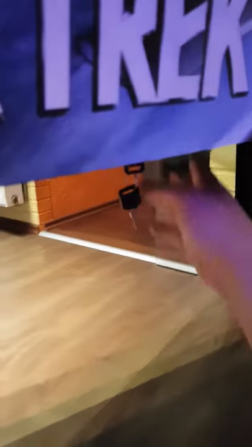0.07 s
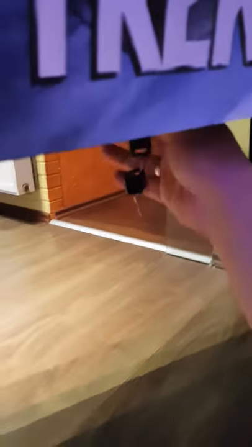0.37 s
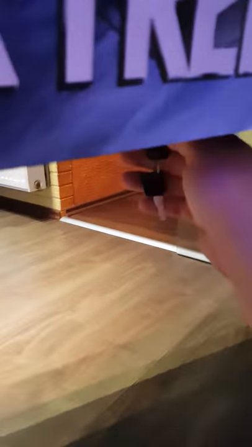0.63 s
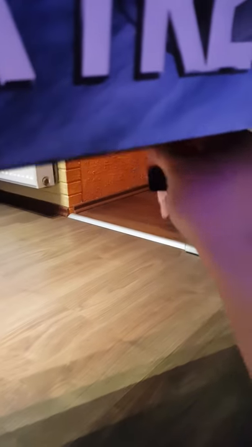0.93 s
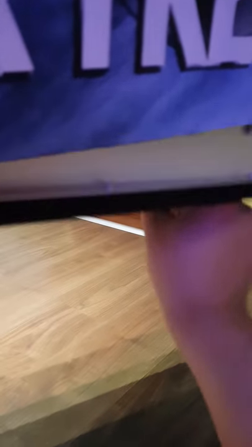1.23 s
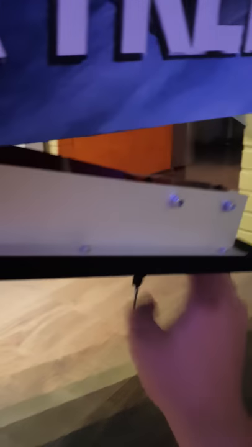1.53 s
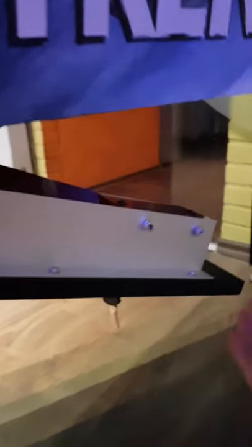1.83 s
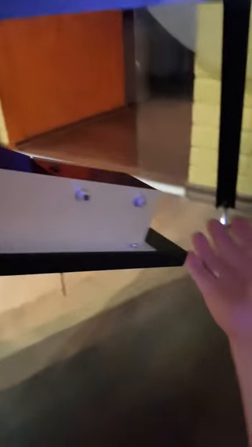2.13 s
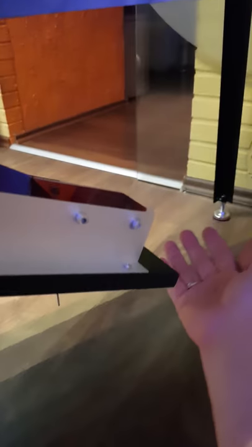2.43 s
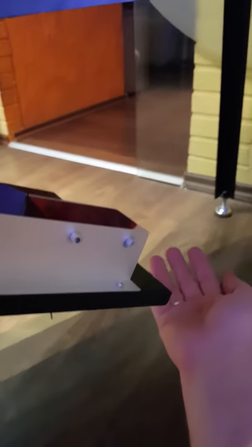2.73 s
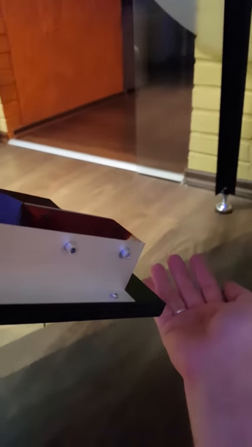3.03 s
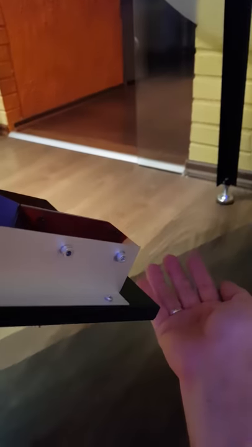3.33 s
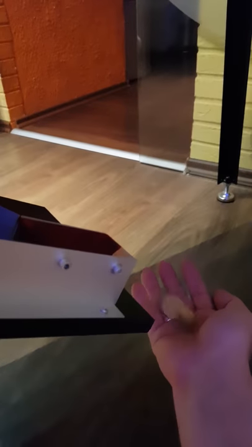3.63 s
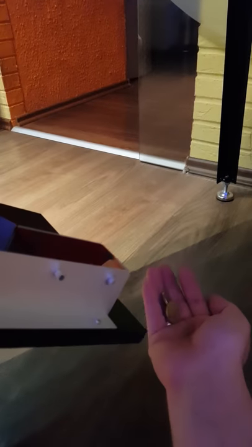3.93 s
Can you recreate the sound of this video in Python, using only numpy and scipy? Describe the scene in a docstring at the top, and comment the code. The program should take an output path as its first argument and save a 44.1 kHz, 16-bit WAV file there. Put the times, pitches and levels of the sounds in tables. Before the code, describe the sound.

Metal coin door unlocking and clacking open, followed by a coin rattling down a return chute.

```python
"""Pinball coin door and coin return

A hand turns the key of a steel coin door; the lock snaps, the wooden cabinet thumps and the door
swings to its stop. A coin clacks through the mechanism, rolls down the return chute and drops,
ringing, into the open hand. All is close to the microphone, in a quiet, hard-walled room."""
import sys
import numpy as np
from scipy import signal
from scipy.fft import rfft, irfft, next_fast_len
from scipy.io import wavfile
from scipy.ndimage import map_coordinates

SR = 44100
rng = np.random.default_rng(int(sys.argv[2]) if len(sys.argv) > 2 else 0)


def int16_out(signal):
    """Quantize to a 16-bit WAV file."""
    q = np.round(np.clip(np.atleast_2d(signal).T, -1, 1) * 32767)
    wavfile.write(sys.argv[1], SR, q.astype(np.int16))


N = 176400
T = np.arange(SR // 2) / SR  # time within one event, s


def struck_steel(hits, modes, colour, ring_db, ring_t60_s, attack_s, pan_db=0, buzz_rad=.7):
    """Each blow is a crash of dense, short-lived plate modes and a few that ring on."""
    out = np.zeros((2, N))
    for start_s, db, tilt_db, t60_s in hits:
        ring = 0
        for hz, mode_db in modes:
            gain = amp(mode_db + 2 * rng.standard_normal())
            phase = 2 * np.pi * hz * T + rng.normal(0, 1, (2, 1))
            buzz = buzz_rad * wobble(len(T), rate_hz=160)  # loose parts smear the modes
            ring += gain * np.sin(phase + buzz)
        blow = noise(len(T)) * fade(t60_s) + amp(ring_db) * ring * fade(ring_t60_s)
        clack = coloured(blow * rise(attack_s), colour, tilt_db, corner_hz=1458)
        add(out, start_s, amp(db) * unit_onset(clack))
    return out * amp([[pan_db], [-pan_db]])


# Each row: start in seconds, level in dB, tilt in dB per octave, t60 in seconds.
LOCK_CLICKS = [(.322, -41.5, -6, 0.053), (.34, -49.5, -0.5, 0.045), (.8755, -39.5, 6, 0.052),
               (.898, -47.5, 9.5, 0.15), (.931, -20.5, 5, 0.09), (.9415, -19, -4, 0.042),
               (1.089, -40, 2, 0.05), (1.149, -36, -2.5, 0.031), (1.159, -38.5, 9, 0.053),
               (1.3455, -27, -3, 0.043), (1.468, -45.5, 2.5, 0.14)]
# Ringing modes and overall spectrum. Each row: frequency in Hz, gain in dB.
LOCK_MODES_DB = [(1420, -3), (1770, 2), (1930, -1), (2030, -4), (2345, -3), (2592, -1), (2685, 0),
                 (3325, 0), (3800, -3), (5392, -1)]
LOCK_SPECTRUM = [(240, -29.5), (400, -9.5), (683, -16.5), (1020, -11), (1420, -0.5), (1590, -6.5),
                 (1930, -3), (3060, -2.5), (3300, -1.5), (5480, -9), (6890, -18), (13300, -25.5),
                 (15500, -43)]

def lock_snaps():
    """The lock and its cam click as the key turns."""
    return struck_steel(LOCK_CLICKS, LOCK_MODES_DB, LOCK_SPECTRUM,
                        ring_db=-21.5, ring_t60_s=.095, attack_s=.0013)


# Each row: start in seconds, level in dB, tilt in dB per octave, t60 in seconds.
DOOR_HITS = [(1.7703, -19, -1, .04), (1.787, -23.5, 2, .04), (1.829, -31, 0, .04), (2.17, -67, 2, .1)]
# Ringing modes and overall spectrum. Each row: frequency in Hz, gain in dB.
DOOR_MODES_DB = [(750, 0), (1816, 3), (2274, 3), (2454, 0), (3507, -2), (3980, -1), (4114, 1), (4616, -1)]
DOOR_SPECTRUM = [(120, -38), (280, -27), (420, -15), (560, -19), (750, -13), (1050, -21), (1500, -11),
                 (1850, -4), (2300, 0), (3200, -2), (4000, 2), (5200, -4), (8000, -7), (11000, -13),
                 (13000, -23), (15500, -36)]

def door_stop():
    """The steel door meets its stop and rebounds."""
    return struck_steel(DOOR_HITS, DOOR_MODES_DB, DOOR_SPECTRUM,
                        ring_db=-24.5, ring_t60_s=.12, attack_s=.001, pan_db=1)


# Each row: start in seconds, level in dB, tilt in dB per octave, t60 in seconds.
MECHANISM_HITS = [(2.915, -65, -4, 0.13), (3.0378, -19, 2.5, 0.083), (3.0757, -26, -2, 0.039),
                  (3.0805, -28.5, -10.5, 0.023), (3.096, -35, -3, 0.13), (3.176, -37.5, -13, 0.11),
                  (3.2045, -34, -7, 0.12), (3.2158, -29, -4, 0.024), (3.2392, -30, -6.5, 0.059),
                  (3.2685, -12, 1, 0.037), (3.272, -15, -1.5, 0.031), (3.278, -15.5, -3.5, 0.038)]
# Ringing modes and overall spectrum. Each row: frequency in Hz, gain in dB.
MECHANISM_MODES_DB = [(700, 5), (1814, -3), (2320, 3), (3836, -3), (3989, 0), (4142, -1), (4345, 0),
                      (4560, 1), (4760, 3), (5017, 3), (6330, 4), (6678, 2), (7850, 1)]
MECHANISM_SPECTRUM = [(120, -38), (300, -37), (520, -32), (700, -20.5), (1000, -30.5), (1430, -15.5),
                      (1620, -17.5), (2300, -4), (3100, -3.5), (4200, 2.5), (5600, -5), (7700, -5),
                      (9000, -7.5), (12000, -13), (15500, -19)]

def mechanism_clacks():
    """The coin strikes the plates of the mechanism."""
    return struck_steel(MECHANISM_HITS, MECHANISM_MODES_DB, MECHANISM_SPECTRUM,
                        ring_db=-28, ring_t60_s=.13, attack_s=.00018, pan_db=1.2, buzz_rad=.4)


# Each row: frequency in Hz, level in dB, t60 in seconds, outer (+1) or inner (-1) mode.
COIN_MODES = [(12657, -1, .3, 1), (13215, -4, .15, -1), (13290, -7, .12, -1), (13380, -4, .15, -1),
              (13576, -6, .3, 1), (13608, -14, .25, 1)]

def coin_ring(lean_db=0):
    """The contact point favours the outer or inner modes; each flutters as the coin tumbles."""
    flutter_hz, flutter_db, flutter_rad = 60, 2, .45
    ring = 0
    for hz, db, t60_s, side in COIN_MODES:
        gain = amp(db + side * lean_db + flutter_db * wobble(len(T), flutter_hz))
        phase = 2 * np.pi * (hz * T + rng.random((2, 1)))
        ring += gain * np.sin(phase + flutter_rad * wobble(len(T), flutter_hz)) * fade(t60_s)
    return ring


# Each row: start in seconds, ring gain in dB, lean to the outer modes in dB, relative click in dB.
COIN_LANDINGS = [(3.6243, -14, -1, -31), (3.639, -16.5, 2, -42), (3.693, -22, -5, -38),
                 (3.713, -17, 4, -34.5), (3.7523, -23.5, -5, -35), (3.781, -28, -2, -55),
                 (3.866, -45, 0, -53), (3.9009, -38, 3, -47), (3.9144, -31, 3, -44.5),
                 (3.9232, -43, -3, -44.5)]
# Each row: frequency in Hz, gain in dB.
CLICK_SPECTRUM = [(500, -46), (2500, -14), (4500, 0), (6500, -3), (8000, 0.5), (10500, -5), (13000, 3),
                  (15000, -3.5)]

def coin_drop():
    """The coin leaves the chute ringing faintly, lands in the hand and bounces on a finger ring."""
    flight_s, flight_db, choke_t60_s = 3.49, -31, .047
    out = np.zeros((2, N))
    add(out, flight_s, amp(flight_db) * coin_ring() * rise(.039) ** 2)
    ends_s = [row[0] for row in COIN_LANDINGS[1:]] + [N / SR]
    for (start_s, ring_db, lean_db, click_db), end_s in zip(COIN_LANDINGS, ends_s):
        free_s = min(end_s - start_s - .008, .045)  # a new contact chokes the ring sooner
        choke = amp(-60 * np.clip(T - free_s, 0, None) / choke_t60_s)
        add(out, start_s, amp(ring_db) * coin_ring(lean_db) * choke * rise(.00023))
        burst = noise(len(T)) * (fade(.0059) + amp(-6) * fade(.15))
        add(out, start_s, amp(click_db + 2.5) * unit_onset(coloured(burst, CLICK_SPECTRUM)))
    return out


# Each row: centre in Hz, bandwidth in Hz, gain in dB.
CHUTE_MODES = [(420, 80, -8), (720, 150, -14), (1425, 100, 3.5), (1860, 100, -9), (2310, 120, 3.5),
               (2570, 150, 0), (4350, 300, -8)]
# Each row: frequency in Hz, gain in dB.
CHUTE_SPECTRUM = [(120, -35), (200, -18.5), (333, -33.5), (422, -12.5), (992, -11), (1400, -7.5),
                  (2060, -6), (2330, -8.5), (3120, -9.5), (4410, -9.5), (9140, -29.5), (13200, -37),
                  (15500, -51.5)]

def chute(x):
    """The return chute's broad colour with its sheet-metal resonances on top."""
    def response(hz):
        modes = sum(amp(db) * resonance(hz, centre, width) for centre, width, db in CHUTE_MODES)
        return amp(-12.5) + modes
    return coloured(filtered(x, response), CHUTE_SPECTRUM)


# Each row: time in seconds, level in dB, the chute's share of the power from 0 to 1.
ROLL_PATH = [(3.03, -120, 0.2), (3.045, -48, 0.3), (3.09, -36.5, 0), (3.17, -46.5, 0.88),
             (3.25, -39.5, 0.97), (3.34, -41, 1), (3.385, -37.5, 0.99), (3.48, -33, 0.87),
             (3.55, -36, 0.97), (3.567, -49.5, 0.84), (3.66, -110, 0.8)]
# Each row: start in seconds, level in dB.
WALL_KNOCKS = [(3.412, -40), (3.4577, -33), (3.479, -37), (3.4887, -33)]

def coin_roll():
    """The milled rim chatters through the mechanism, then down the chute, knocking on its walls."""
    level_db, share = curves(ROLL_PATH)
    in_chute = unit(chute(grit(rate_hz=250, depth_db=1.5)))
    in_mechanism = unit(coloured(grit(rate_hz=1100, depth_db=2), MECHANISM_SPECTRUM))
    out = amp(level_db) * (np.sqrt(share) * in_chute + np.sqrt(1 - share) * in_mechanism)
    for start_s, db in WALL_KNOCKS:
        add(out, start_s, amp(db) * unit_onset(chute(noise(len(T)) * fade(.024))))
    return out


# Each row: start in seconds, relative level in dB, pitch of the push in Hz.
CABINET_BUMPS = [(.222, -51.5, 100), (.286, -35.5, 90), (.322, -34.5, 85), (0.816, -44.5, 175),
                 (0.874, -34.5, 88), (0.929, -32, 112.5), (0.961, -37, 140), (1.14, -31.5, 200),
                 (1.164, -30.5, 215), (1.199, -41, 130), (1.331, -38, 125), (1.457, -43.5, 390),
                 (1.478, -43.5, 130)]
# Each row: frequency in Hz, level in dB, t60 in seconds.
CABINET_MODES = [(80, 0, .06), (112, 2, .06), (168, 1, .08), (208, 0, .085), (430, 1, .06), (780, 5, .05)]
# Each row: frequency in Hz, gain in dB.
WOOD_SPECTRUM = [(35, -30.5), (85, 5), (200, 0), (420, -8.5), (600, -14), (850, -11), (2500, -58.5),
                 (8000, -91.5)]

def cabinet_thumps():
    """Hand and door bump the wooden box; each push favours the modes near its pitch."""
    focus_db_per_octave = 16
    out = np.zeros((2, N))
    for start_s, db, push_hz in CABINET_BUMPS:
        boom = np.zeros((1, len(T)))
        for hz, mode_db, t60_s in CABINET_MODES:
            gain = amp(mode_db - focus_db_per_octave * abs(np.log2(hz / push_hz)))
            boom += gain * np.sin(2 * np.pi * hz * T) * fade(t60_s)
        knock = coloured(noise(len(T)) * fade(.074), WOOD_SPECTRUM)
        thump = unit_onset(boom, samples=800) + amp(-10) * unit_onset(knock, samples=800)
        add(out, start_s, amp(db + 6) * thump * rise(.0065))
    return out


# Each row: start in seconds, pitch in Hz, level in dB.
SQUEAK_SLIPS = [(0.396, 1770, -49), (0.483, 2670, -49.5), (1.215, 2620, -42), (1.244, 2190, -42.5),
                (1.54, 3450, -46.5), (1.68, 3200, -55), (1.754, 2150, -52)]

def squeaks():
    """Each brief slip of key or hinge sings in one narrow resonance over a broad rasp."""
    length_s, width_ratio, rasp_db, rasp_cutoff_hz = .015, .0751, -24.5, 6000
    out = np.zeros((2, N))
    swell = (3 * T / length_s) ** 2 * np.exp(-6 * T / length_s)
    for start_s, pitch_hz, db in SQUEAK_SLIPS:
        def response(hz):
            rasp = amp(rasp_db) / (1 + 1j * hz / rasp_cutoff_hz)
            return resonance(hz, pitch_hz, pitch_hz * width_ratio) + rasp
        tone = filtered(noise(len(T)) * swell, response)
        add(out, start_s, amp(db) * unit_onset(tone, samples=600))
    return out


# Each row: time in seconds, level in dB.
SCRAPE_LEVELS = [(0, -61.5), (.1, -95), (.23, -65), (.3, -59), (.34, -49), (.41, -52), (.45, -41),
                 (.495, -47.5), (.53, -61.5), (.62, -68), (.86, -64.5), (1.05, -54), (1.4, -69),
                 (1.5, -50.5), (1.62, -65.5), (2.3, -78)]
HISS_LEVELS = [(0, -64.5), (.17, -73), (.3, -76.5), (.55, -71), (.72, -63.5), (.85, -66.5), (1, -87.5)]
# Each row: frequency in Hz, gain in dB.
SCRAPE_SPECTRUM = [(240, -9.5), (400, -19), (614, -19.5), (796, -12.5), (1320, -13), (1710, -1), (2030, -6),
                   (4290, -6), (12100, -10), (15500, -7)]
HISS_SPECTRUM = [(3000, -25), (5100, -15.5), (5750, -3.5), (6400, -19.5), (9000, -35.5)]

def key_scrape():
    """The key slides smoothly over the pins; a thin hiss goes with the sliding hand."""
    scrape = unit(coloured(grit(rate_hz=150, depth_db=1.2), SCRAPE_SPECTRUM))
    hiss = unit(coloured(noise(N), HISS_SPECTRUM))
    return amp(curves(SCRAPE_LEVELS)[0]) * scrape + amp(curves(HISS_LEVELS)[0]) * hiss


# Each row: time in seconds, level in dB.
RUSTLE_LEVELS = [(0, -55), (.14, -70), (.45, -55), (.7, -71), (.85, -50.5), (1.5, -58.5), (1.7, -74.5),
                 (2.45, -67)]
# Each row: frequency in Hz, gain in dB.
RUSTLE_SPECTRUM = [(70, 3), (150, -1), (420, -5), (750, -14), (1200, -15.5), (1600, -31), (6000, -44)]

def hand_rustle():
    """Skin and sleeve brush against the cabinet."""
    brush = unit(coloured(grit(rate_hz=36, depth_db=2.5), RUSTLE_SPECTRUM))
    return amp(curves(RUSTLE_LEVELS)[0]) * brush


# Each row: frequency in Hz, t60 in seconds.
ROOM_DECAY = [(80, 1), (400, 0.46), (1500, 0.34), (4000, 0.53), (8000, 0.54), (15000, 0.28)]
# Each row: frequency in Hz, gain in dB.
ROOM_SPECTRUM = [(100, 2), (1500, -4.5), (4000, -8.5), (15000, -9)]
# Each row: frequency in Hz, left-right correlation.
ROOM_COHERENCE = [(100, 0.92), (300, 0.35), (900, 0.62), (3000, 0.03)]

def room_reverb(x, build_s=.0047):
    """The hard walls return a diffuse tail in which each frequency dies at its own speed."""
    hz, t, bands = signal.stft(noise(SR, ROOM_COHERENCE), SR, nperseg=256)
    decay = fade(along(ROOM_DECAY, hz)[:, None], t)
    tail = signal.istft(bands * decay, SR, nperseg=256)[1]
    tail *= rise(build_s, np.arange(tail.shape[1]) / SR)
    tail = coloured(tail / np.linalg.norm(tail[0]), ROOM_SPECTRUM)
    return signal.fftconvolve(x, tail, axes=1)[:, :N]


# Each row: frequency in Hz, gain in dB.
AIR_SPECTRUM = [(15, -45), (25, -19), (59, -1), (193, -16), (233, -20.5), (567, -36), (648, -35),
                (6550, -40), (15500, -33)]

def room_air(level_db=-65.5):
    """A low, steady hum of air."""
    return amp(level_db) * unit(coloured(noise(N, ROOM_COHERENCE), AIR_SPECTRUM))


# Each row: frequency in Hz, left-right correlation.
CLOSE_COHERENCE = [(100, 1), (300, 0.93), (1000, 0.12), (4000, 0.2), (14000, 0.71)]

def noise(size, coherence=CLOSE_COHERENCE):
    """White stereo noise, nearly mono in the bass."""
    def mid_side_gains(hz):
        angle = np.arccos(np.clip(along(coherence, hz), -1, 1)) / 2
        return np.array([np.cos(angle), np.sin(angle)])
    mid, side = filtered(rng.standard_normal((2, size)), mid_side_gains)
    return np.array([mid + side, mid - side])


def grit(rate_hz, depth_db):
    """Noise broken into tiny slips of random strength."""
    return unit(noise(N) * amp(depth_db * wobble(N, rate_hz)))


def wobble(size, rate_hz):
    """A smooth curve through rate_hz random knots a second."""
    knots = rng.standard_normal(int(size * rate_hz / SR) + 4)
    return map_coordinates(np.clip(knots, -2, 2), [np.arange(size) * rate_hz / SR])


def coloured(x, points, tilt_db=0, corner_hz=100):
    """Minimum-phase filter through (Hz, dB) points, tilted per octave above a corner."""
    def response(hz):
        db = along(points, hz) + tilt_db * np.log2(np.hypot(1, hz / corner_hz))
        cepstrum = irfft(np.log(amp(db)))
        half = len(cepstrum) // 2
        cepstrum[1:half] *= 2
        cepstrum[half + 1:] = 0
        return np.exp(rfft(cepstrum))
    return filtered(x, response)


def filtered(x, response):
    """Apply a complex frequency response."""
    size = 2 * next_fast_len(x.shape[-1] // 2 + 4096)
    spectrum = rfft(x, size) * response(np.fft.rfftfreq(size, 1 / SR))
    return irfft(spectrum, size)[..., :x.shape[-1]]


def resonance(hz, centre_hz, width_hz):
    """Two-pole band-pass response."""
    return 1j * hz * width_hz / (centre_hz ** 2 - hz ** 2 + 1j * hz * width_hz)


def amp(db):
    """Decibels to gain."""
    return 10 ** (np.asarray(db) / 20)


def unit(x):
    """Scale to rms 1."""
    return x / np.sqrt(np.mean(x ** 2) + 1e-20)


def unit_onset(x, samples=220):
    """Scale a blow so that its first samples have rms 1."""
    return x / np.sqrt(np.mean(x[:, :samples] ** 2) + 1e-20)


def rise(tau_s, t=T):
    """Exponential attack."""
    return 1 - np.exp(-t / tau_s)


def fade(t60_s, t=T):
    """Exponential decay."""
    return np.exp(-np.log(1000) * t / t60_s)


def along(points, hz):
    """Interpolate (Hz, value) points on a log axis."""
    knots_hz, values = np.transpose(points)
    return np.interp(np.log(hz + 1), np.log(knots_hz + 1), values)


def curves(rows):
    """One value per sample for each column after the time."""
    times_s, *columns = np.transpose(rows)
    return [np.interp(np.arange(N) / SR, times_s, column) for column in columns]


def add(track, start_s, x):
    """Mix x into the track."""
    part = track[:, round(start_s * SR):][:, :x.shape[-1]]
    part += x[..., :part.shape[-1]]


def scene():
    """Door, coin and cabinet in the room, over a low hum of air."""
    lock = lock_snaps()
    clatter = door_stop() + mechanism_clacks() + key_scrape()
    thumps = cabinet_thumps()
    drop = coin_drop()
    squeak = squeaks()
    roll = coin_roll()
    direct = lock + squeak + drop + clatter + roll + thumps
    send = lock + squeak + drop + amp(1.5) * clatter + amp(-2.5) * roll + amp(-10) * thumps
    return direct + room_reverb(send) + room_air() + hand_rustle()


# Each row: frequency in Hz, left over right in dB.
PORT_BALANCE = [(60, -1), (500, -0.2), (2000, -1.5), (4000, -4), (8000, -1.5), (13000, -4)]

def record(dry):
    """Two band-limited microphone ports; the sound reaches the left one a little earlier."""
    left_lead_s, top_hz = .1686e-3, 15750
    side = np.array([[.5], [-.5]])
    def response(hz):
        balance = amp(side * along(PORT_BALANCE, hz))
        lead = np.exp(2j * np.pi * hz * side * left_lead_s)
        return balance * lead / (1 + (hz / top_hz) ** 120)
    return filtered(dry, response)


dry = scene()
out = record(dry)
int16_out(out)
```